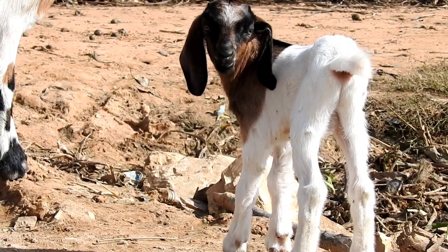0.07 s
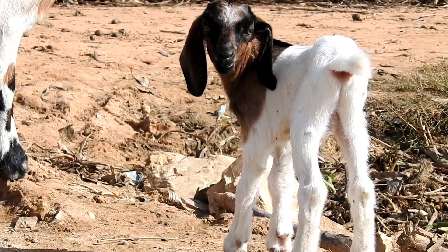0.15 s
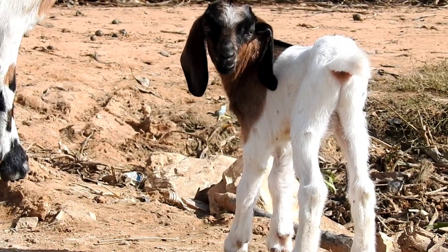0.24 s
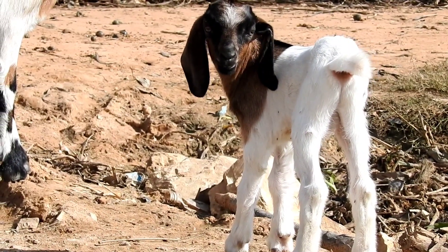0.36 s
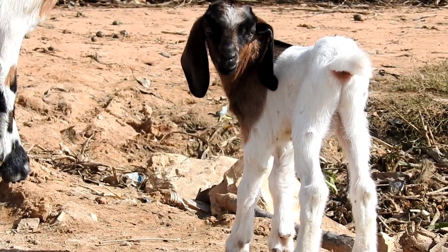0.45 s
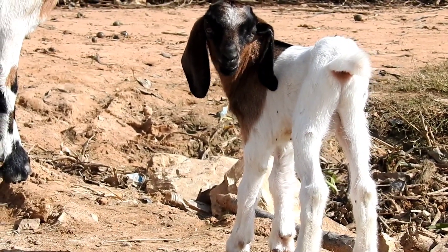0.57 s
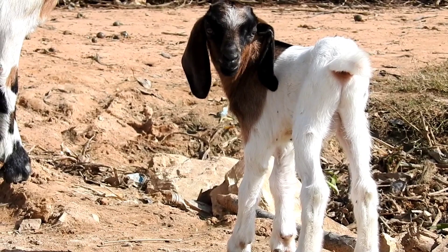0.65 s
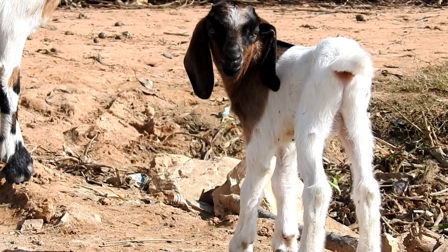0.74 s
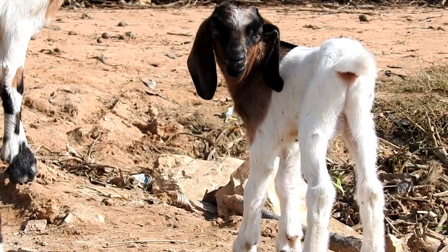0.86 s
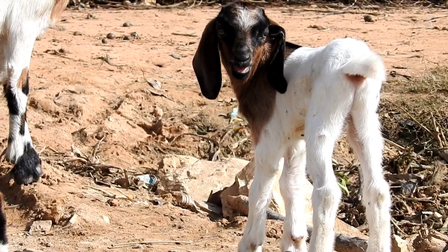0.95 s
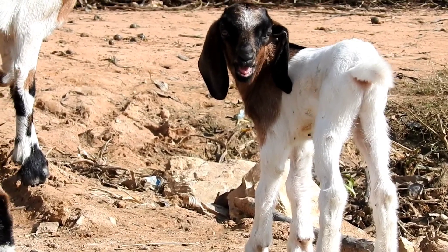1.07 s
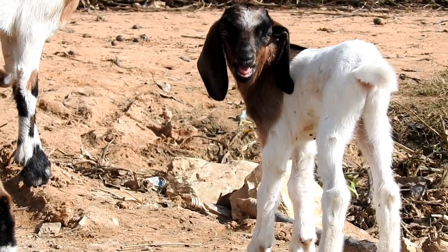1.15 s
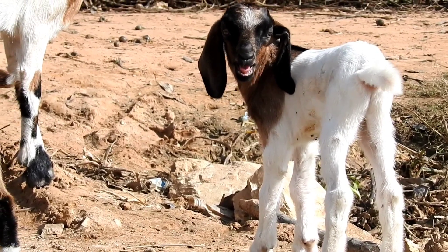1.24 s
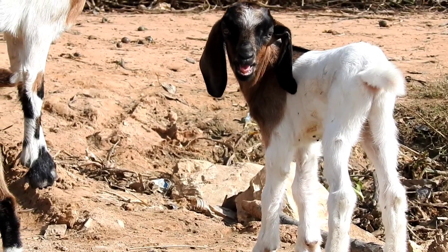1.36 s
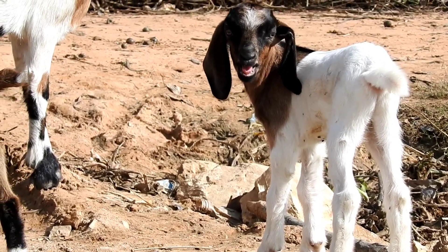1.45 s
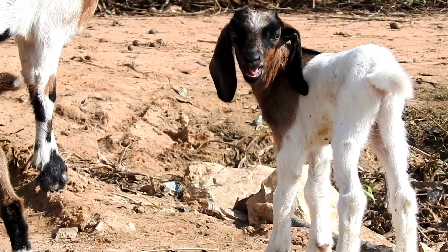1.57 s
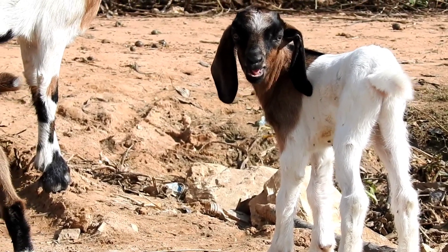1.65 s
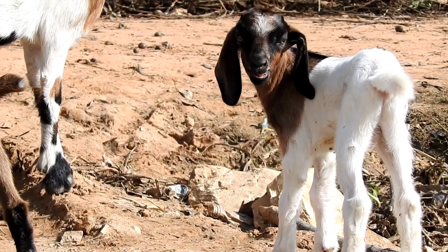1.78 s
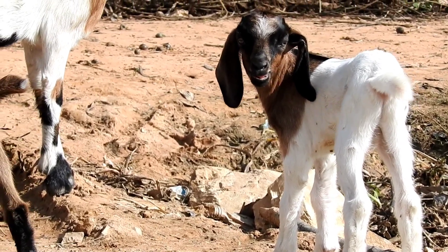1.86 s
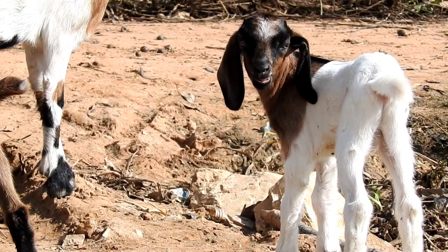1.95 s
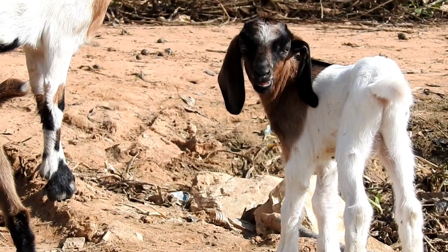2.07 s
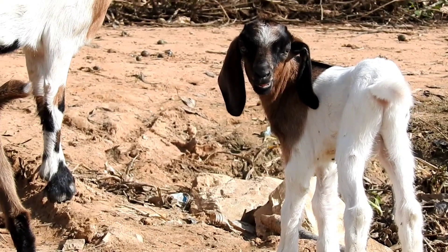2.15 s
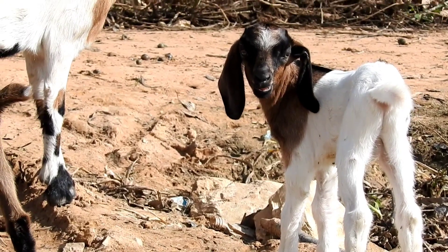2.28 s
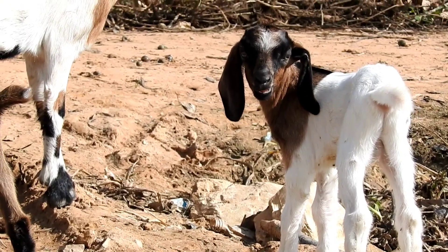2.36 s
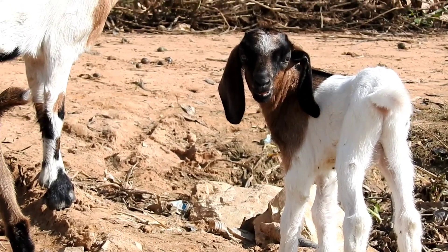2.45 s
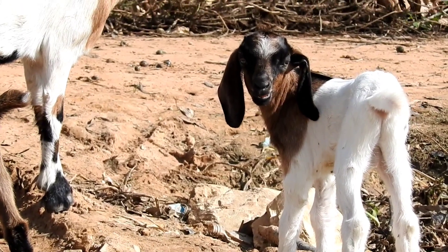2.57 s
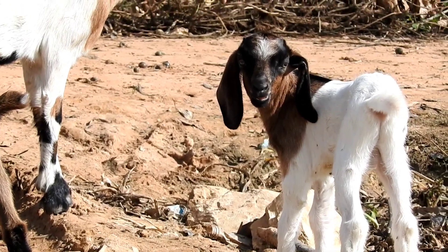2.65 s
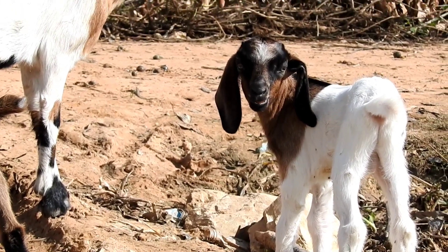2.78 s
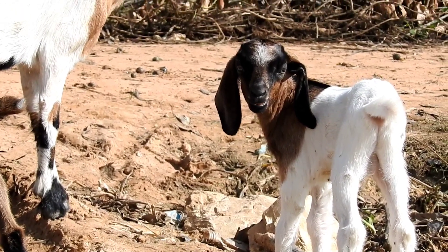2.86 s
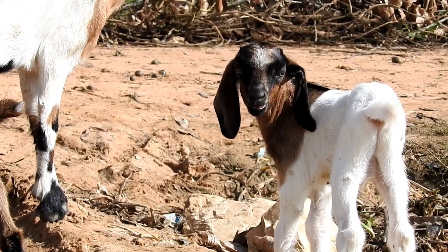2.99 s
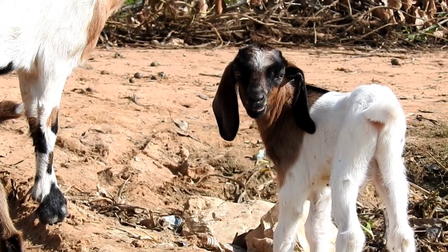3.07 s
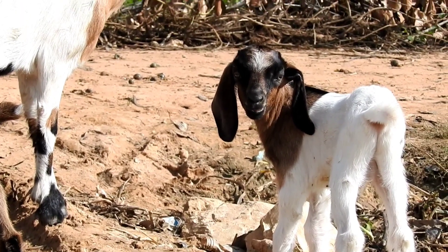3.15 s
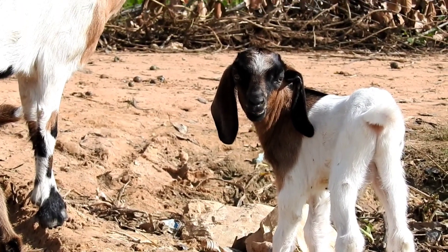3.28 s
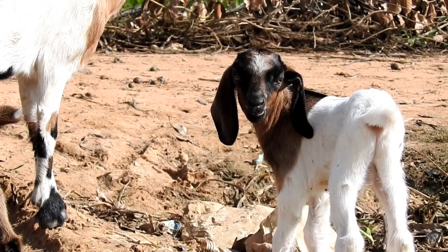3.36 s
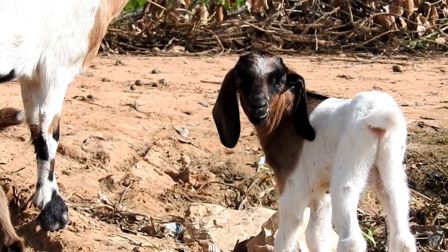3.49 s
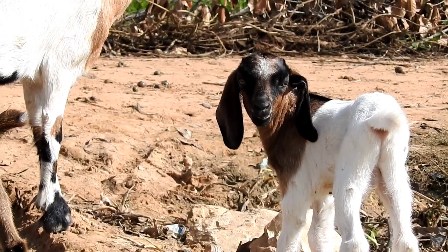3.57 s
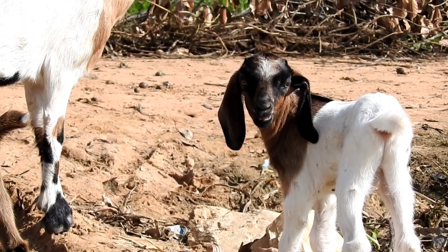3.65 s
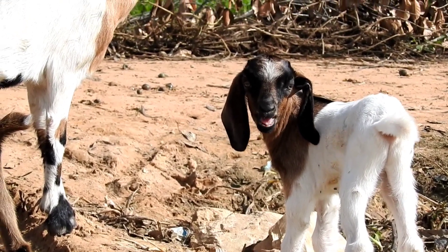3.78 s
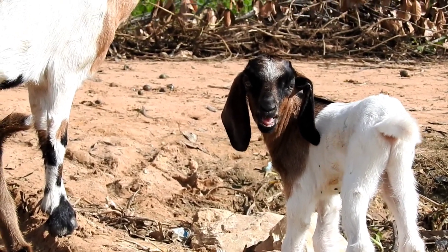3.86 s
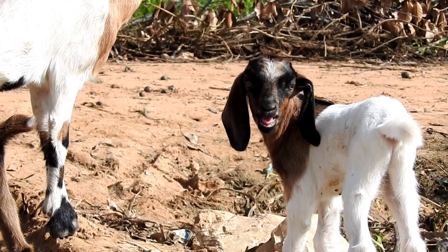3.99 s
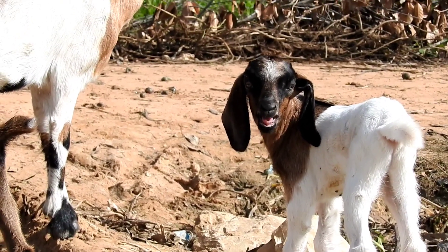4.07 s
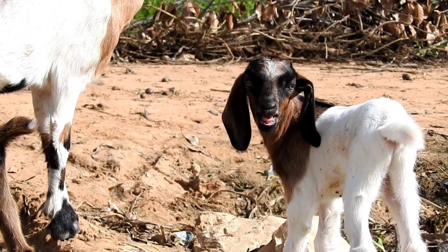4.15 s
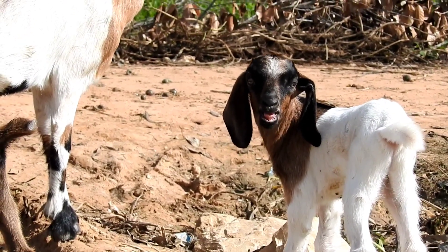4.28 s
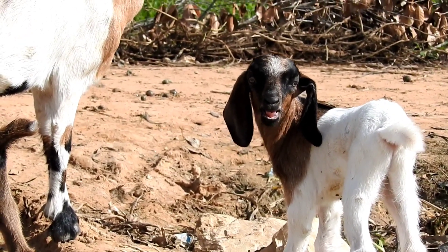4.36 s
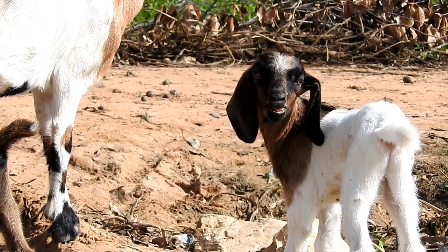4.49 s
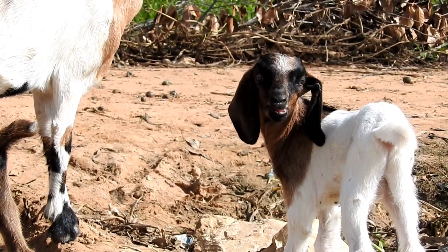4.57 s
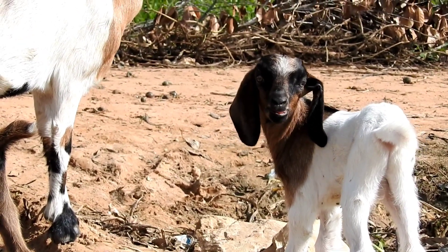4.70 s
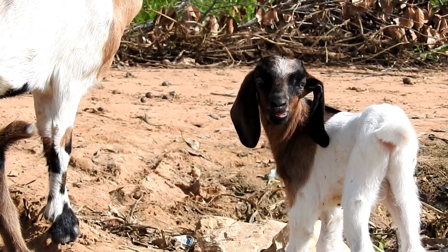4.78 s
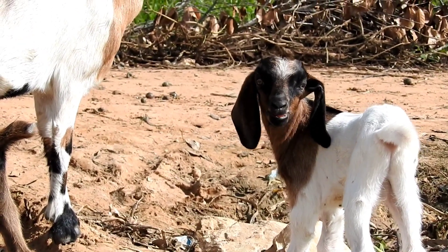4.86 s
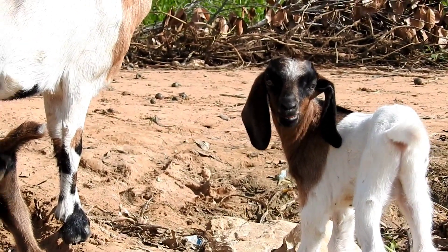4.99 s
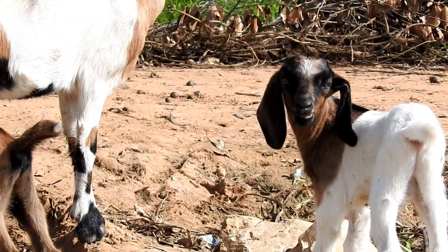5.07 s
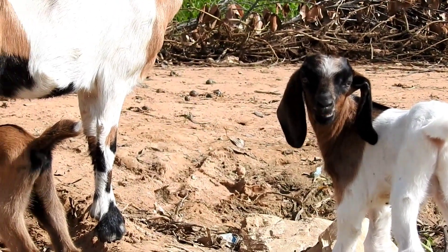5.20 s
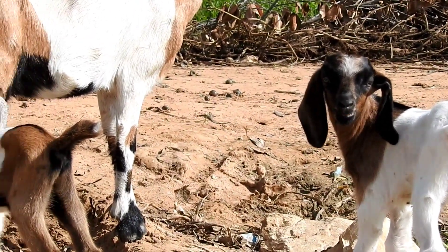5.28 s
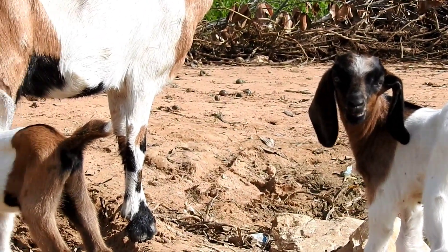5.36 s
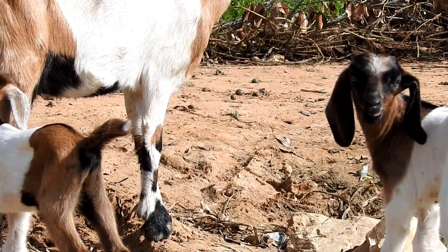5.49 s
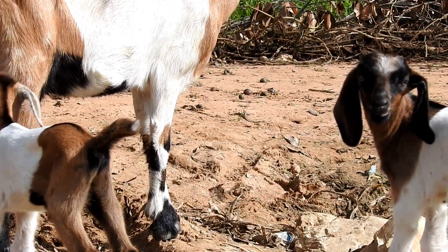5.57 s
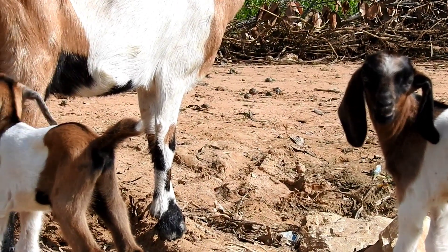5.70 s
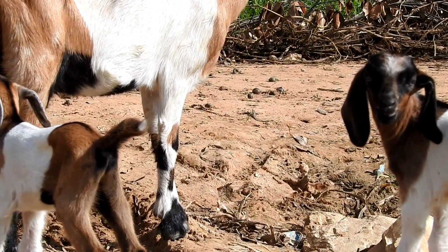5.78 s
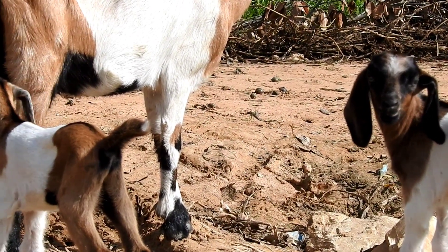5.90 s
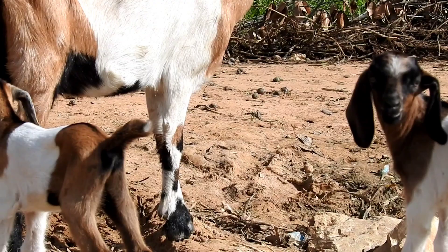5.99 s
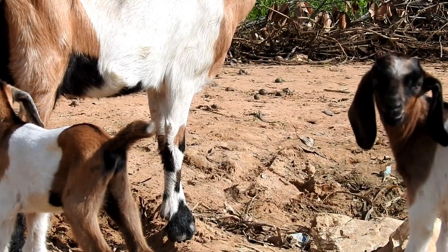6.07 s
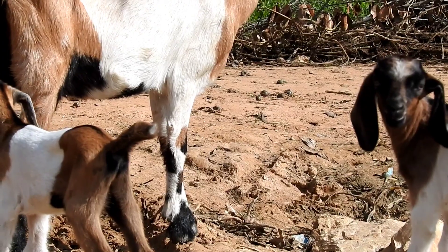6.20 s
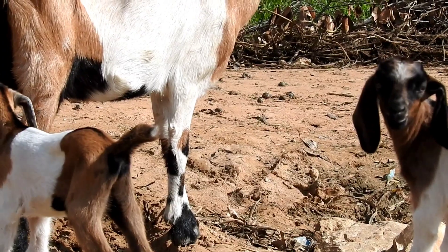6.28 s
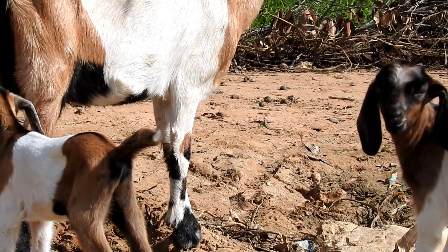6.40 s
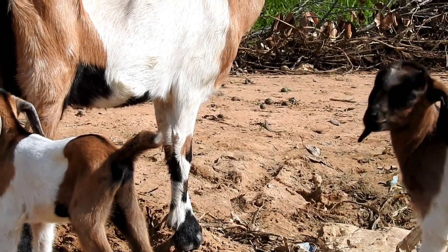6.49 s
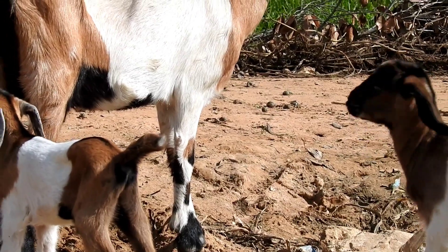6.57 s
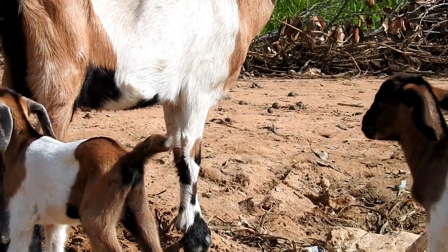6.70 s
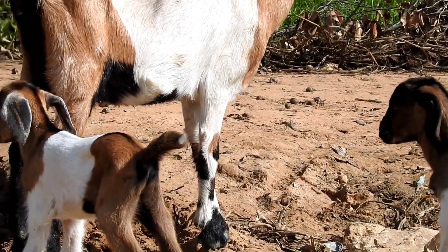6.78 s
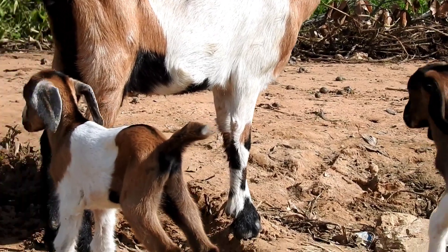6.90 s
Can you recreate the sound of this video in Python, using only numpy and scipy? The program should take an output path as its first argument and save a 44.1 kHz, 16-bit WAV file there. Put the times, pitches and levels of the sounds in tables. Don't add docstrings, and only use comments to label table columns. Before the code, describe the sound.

An open, dry goat yard with a faint far rumble, steady airy hiss and light rustle of litter. At 0 s the end of a neighbouring kid's bleat fades within about a quarter second. A small bird repeats a short note, rough buzz and falling flick roughly three times a second, with tiny whistles from other birds. A far kid calls weakly near 0.3 s and a soft hum follows. From 1.0 to 1.6 s the close newborn bleats loudly, high and nasal, quavering about eleven times a second, then shuts off. Small scuffs and ticks follow; a distant doe calls faintly at 3.5 s. The second bleat runs 3.7 to 4.4 s, weakening at its end. Snorts puff at 4.5, 5.0 and 5.8 s, a far kid answers at 5.1 s, and heavier hoof thuds with gritty crunches grow from 5.7 s to the end at 6.9 s, amid low wind bumps and brighter bird phrases.

```python
import sys
import numpy as np
from scipy import signal
from scipy.fft import rfft, irfft, next_fast_len
from scipy.io import wavfile
from scipy.ndimage import uniform_filter1d

SR = 44100
rng = np.random.default_rng(int(sys.argv[2]) if len(sys.argv) > 2 else 0)


def store_wav(level_fs):
    pcm = np.round(np.clip(np.atleast_2d(level_fs), -1, 1) * 32767)
    wavfile.write(sys.argv[1], SR, pcm.T.astype(np.int16))


def amplitude_ratio(level_db):
    exponent = np.asarray(level_db, float) / 20
    return 10 ** exponent


N = 306009
TIME = np.arange(N) / SR
SPLIT_HZ, TREBLE_LAG_S = 3870, 0.01057
LEFT_RIGHT = np.array([[1], [-1]])


def rms_one(x):
    return x / np.sqrt(np.mean(x ** 2) + 1e-20)


def at_hz(points, hz):
    point_hz, value = np.array(points)[:, :2].T
    return np.interp(np.log(hz), np.log(point_hz), value)


def drift(rate, size=N):
    r = np.exp(-32 * np.pi * rate / SR)
    slow = signal.lfilter([1], [1, -2 * r, r * r], rng.standard_normal(size // 16 + 1002))[1000:]
    return np.interp(np.arange(size) / 16, np.arange(len(slow)), rms_one(slow))


def steady(rate, size):
    return uniform_filter1d(uniform_filter1d(drift(rate, size), size=130), size=90)


def glide(t, s, v):
    slope = np.diff(v) / np.diff(s)
    a, b = slope[:-1], slope[1:]
    m = np.r_[0, np.where(a * b > 0, 2 * a * b / (a + b + 1e-9), 0), 0]
    k = np.clip(np.searchsorted(s, t) - 1, 0, len(s) - 2)
    h = s[k + 1] - s[k]
    u = (t - s[k]) / h
    cubic = m[k] + m[k + 1] - 2 * slope[k]
    square = 3 * slope[k] - 2 * m[k] - m[k + 1]
    return v[k] + h * u * (m[k] + u * (square + u * cubic))


def resonances(modes, hz):
    power = 0
    for top, width, db in modes:
        power = power + amplitude_ratio(2 * db) / (1 + (2 * (hz - top) / width) ** 2) ** 2.314
    return np.sqrt(power)


def coloured(x, gain_of_hz):
    size = next_fast_len(x.shape[-1])
    hz = np.maximum(np.arange(size // 2 + 1) * SR / size, 1)
    return irfft(rfft(x, size) * gain_of_hz(hz), size)[..., :x.shape[-1]]


def bandpass(x, low_hz, high_hz, order=2):
    return signal.sosfilt(signal.butter(order, [low_hz, high_hz], "band", fs=SR, output="sos"), x)


def add(out, s, length, source, db, rise, fall):
    at = slice(round(s * SR), min(round((s + .4) * SR), N))
    t = TIME[at] - TIME[at][0]
    fade = np.exp(-.5 * np.minimum(t, length) / length - np.maximum(t - length, 0) / fall)
    out[at] += amplitude_ratio(db) * source[at] * np.clip(t / rise, 0, 1) * fade


def early(x):
    return np.roll(x, -round(TREBLE_LAG_S * SR), axis=-1)


# (frequency [Hz], likeness [-1 to 1])
EAR_LIKENESS = [(60, 1), (130, 1), (290, 0.95), (640, 0.89), (1410, 0.65), (3100, 0.53), (6820, -0.93),
                (15000, 0.99)]


def banded_noise(spectrum, patchy_db):
    out, edges = 0, np.geomspace(max(spectrum[0][0], 20), min(spectrum[-1][0], 16000), 13)
    white = rng.standard_normal((2, 2, N))
    for k, (low, high) in enumerate(zip(edges, edges[1:])):
        mid, side = bandpass(white[k % 2], low, high)
        alike = np.clip(at_hz(EAR_LIKENESS, np.sqrt(low * high)), -1, 1)
        flicker = amplitude_ratio(patchy_db * (low < 7000) * (drift(3) + .6 * drift(14))) / np.sqrt(low / high + 1)
        out = out + flicker * (np.sqrt(1 + alike) * mid + np.sqrt(1 - alike) * side * LEFT_RIGHT)
    return rms_one(coloured(out, lambda hz: amplitude_ratio(at_hz(spectrum, hz))))


# (frequency [Hz], level [dB per Hz])
AIR_SPECTRUM = [(15, -58), (25, -17.5), (107, 1), (173, -2), (260, -12), (523, -19.5), (970, -30.5),
                (2420, -63), (4150, -16.5), (4620, -45), (9050, -29), (10100, -46), (15500, -54)]


def rumble_and_hiss():
    air = banded_noise(AIR_SPECTRUM, patchy_db=1.5)
    rumble = signal.sosfilt(signal.butter(2, 240, fs=SR, output="sos"), air)
    return amplitude_ratio(-36.5 + 1.14 * drift(1.7)) * rms_one(rumble) + amplitude_ratio(-41.5) * rms_one(air - rumble)


# (time [s], level [dB])
LITTER_STIR = [
    (0, -41),
    (3.3, -41.5),
    (3.8, -37),
    (6.94, -39),
]
# (frequency [Hz], level [dB per Hz])
LITTER_SPECTRUM = [(200, -5.5), (400, -7), (900, -2), (1500, -8.5), (3000, -9), (6000, -4), (9000, -17.5),
                   (12000, -54)]


def rustle():
    stir_db = np.interp(TIME, *np.transpose(LITTER_STIR))
    return amplitude_ratio(stir_db - 4.5) * banded_noise(LITTER_SPECTRUM, patchy_db=3.5)


# (time [s], peak level [dB])
WIND_GUSTS = [(3.82, -25), (4.2, -24.5), (4.4, -46), (4.82, -26.5), (5.38, -29), (5.6, -32), (6.32, -28),
              (6.65, -39)]


def wind():
    puffs = bandpass(rng.standard_normal((2, N)), 42, 115, order=3)
    rise_db_per_s, fall_db_per_s = 298, 250
    level = amplitude_ratio(-56.5)
    for s, db in WIND_GUSTS:
        level = level + amplitude_ratio(db + np.minimum(rise_db_per_s * (TIME - s), fall_db_per_s * (s - TIME)))
    return rms_one(puffs) * level * amplitude_ratio(3. * LEFT_RIGHT)


# (time [s], from [Hz], to [Hz], length [s], level [dB])
WHISTLES = [(0.375, 3550, 3000, 0.023, -44), (0.835, 3900, 2540, 0.026, -42),
            (1.684, 6370, 4980, 0.045, -48), (1.867, 3900, 3000, 0.018, -39),
            (2.402, 3500, 2980, 0.018, -42.5), (2.5, 5450, 4760, 0.017, -43),
            (2.65, 5500, 5000, 0.036, -46), (2.012, 5600, 4640, 0.011, -52),
            (2.225, 6250, 5200, 0.044, -56), (4.4, 3720, 2830, 0.023, -37), (4.618, 3800, 2720, .035, -40),
            (4.764, 3500, 2900, .018, -52), (5.417, 6000, 4960, 0.04, -51), (5.525, 4720, 3500, 0.014, -42),
            (2.853, 5300, 4660, 0.013, -44), (2.936, 3500, 2920, .02, -57), (4.458, 6400, 4760, 0.043, -45),
            (4.69, 5800, 5100, 0.014, -44), (4.953, 5830, 4900, 0.028, -40), (5.863, 6240, 5280, .035, -49),
            (6.1, 6500, 5430, 0.035, -50), (5.234, 4550, 4330, 0.086, -49), (5.262, 3480, 2880, 0.013, -50)]


def flicks():
    out = np.zeros(N)
    for s, from_hz, to_hz, length, db in WHISTLES:
        u = np.arange(round(length * SR)) / (length * SR)
        i = round((s - TREBLE_LAG_S * (to_hz > SPLIT_HZ)) * SR)
        phase = 2 * np.pi * np.cumsum(from_hz + (to_hz - from_hz) * u) / SR
        out[i:i + len(u)] += amplitude_ratio(db) * np.sin(np.pi * u) * np.sin(phase)
    return out


# (time [s], opening note level [dB], buzz level [dB])
BIRD_PHRASES = [(0.022, -38, -40.5), (0.326, -43, -39.5), (0.626, -40.5, -39.5), (0.928, -40, -38),
                (1.852, -35, -38), (2.16, -36, -39), (2.456, -40.5, -38), (2.765, -40, -35.5),
                (3.075, -35.5, -34), (3.379, -33, -35), (3.674, -32, -35), (4.6, -34, -31.5),
                (5.821, -36, -36.5), (6.153, -31, -30.5), (6.486, -32, -30), (6.817, -27.5, -30),
                (1.24, -39, -42), (1.547, -38, -40), (3.984, -35, -41), (4.286, -34, -40)]


def bird():
    out, t = np.zeros(N + SR), np.arange(SR // 5) / SR
    flick_s = .125
    for s, note_db, buzz_db in BIRD_PHRASES:
        stretch, shift = 1 + 0.0072 * rng.standard_normal(2)
        u = t * stretch
        note, flick = u < .03, u > flick_s
        turn = (u * 112 + 0.23 * drift(40, len(t))) % 1
        flick_hz = np.maximum(4000 - 62000 * (u - flick_s), 2900)
        buzz_hz = 4800 - 1100 * turn - 3000 * u
        hz = np.where(note, 4440 - 11000 * u, np.where(flick, flick_hz, buzz_hz))
        shape = amplitude_ratio(note_db) * np.clip(np.minimum(u / .005, (.018 - u) / .005), 0, 1)
        buzz = amplitude_ratio(buzz_db + 2.6 * drift(66, len(t))) * np.sin(np.pi * turn)
        shape += buzz * np.clip((u - .03) / 0.082, 0, 1) * ~flick
        shape += amplitude_ratio(buzz_db - 4.5) * flick * np.clip((flick_s + .021 - u) / .005, 0, 1)
        i = round(s * SR)
        out[i:i + len(t)] += shape * np.sin(2 * np.pi * np.cumsum(hz * shift) / SR)
    return out[:N]


def quaver(t, squeezes):
    s, *columns = np.transpose(squeezes)
    rests = np.r_[s[0] - .03, s[:-1] + 0.538 * np.diff(s), s[-1] + .03]
    turns = np.sort(np.r_[s, rests])
    t = np.clip(t, turns[0], turns[-1])
    return [glide(t, turns, np.r_[0, np.ravel([c, 0 * c], "F")]) for c in columns]


# (frequency [Hz], left minus right [dB])
HEAD_SHADOW = [(500, 0), (800, 0.5), (1300, 0), (1600, -4), (2000, 4), (2400, 0), (3300, 0.5), (3900, 4),
               (6000, -0.9), (15000, -0.5)]


def bleat(turns, throat, squeezes=(), shade=-0.98):
    s, *columns = np.transpose(turns)
    at = slice(round(s[0] * SR), round(s[-1] * SR))
    pitch, level_db, low_db, rough = [glide(TIME[at], s, c) for c in columns]
    size = len(pitch)
    rise, loss_db = quaver(TIME[at], squeezes) if squeezes else (0, 0)
    pitch, level_db = pitch + rise, level_db - loss_db
    shake = np.clip(rough + .0006 * rise, 0, 1) ** 2
    wobble = 1 + 0.00253 * steady(75, size) + 0.035 * shake * drift(290, size)
    phase = 2 * np.pi * np.cumsum(pitch * wobble) / SR
    voice, power = 0, 1e-12

    def lips(hz):
        return resonances(throat, hz) / np.sqrt(1 + (hz / 11300) ** 16)

    for k in range(1, 21):
        hz = k * pitch
        tilt_db = (low_db - 0.09 * rise) * (k > 1) / (1 + (hz / 4500) ** 8)
        tilt_db = tilt_db + 0.38 * low_db / (1 + (7600 / hz) ** 8)
        gain = lips(hz[::8]) * amplitude_ratio(tilt_db[::8])
        power = power + gain ** 2 / 2
        lean = amplitude_ratio(-shade * at_hz(HEAD_SHADOW, hz[::8]) / 2 * LEFT_RIGHT)
        shimmer = amplitude_ratio((.7 + .2 * k) * steady(70, size) + (4 * shake + .07 * k) * drift(200, size))
        partial = np.sin(k * phase + rng.normal(0, 1.0) - np.pi / 2 + 0.11 * shade * LEFT_RIGHT)
        voice = voice + np.repeat(gain * lean, 8, axis=1)[:, :size] * shimmer * partial
    voice = voice / np.sqrt(np.repeat(power, 8)[:size])
    air = rms_one(coloured(rng.standard_normal(size), lambda hz: lips(hz) * (0.24 + (hz / 5000) ** 3)))
    out = np.zeros((2, N))
    out[:, at] = amplitude_ratio(level_db) * (voice * np.sqrt(1 - shake ** 2) + (amplitude_ratio(-31) + shake) * air)
    return out


# (time [s], pitch [Hz], level [dB], low partials [dB], roughness [0-1])
DOE_CALL = [(3.49, 625, -64, 0, .6), (3.52, 625, -54, 0, .5), (3.575, 620, -56, 0, .6),
            (3.595, 590, -66, 0, .7), (3.62, 585, -54, 0, .5), (3.67, 600, -64, 0, .8),
            (3.73, 665, -56, 0, .5), (3.755, 670, -44, 0, .3), (3.775, 670, -62, 0, .5)]
# (frequency [Hz], width [Hz], level [dB])
DOE_RESONANCES = [(593, 150, -11), (1200, 360, 10), (2300, 300, -12), (3500, 800, -30)]


def far_doe():
    return bleat(DOE_CALL, DOE_RESONANCES, shade=0.)


# (time [s], pitch [Hz], level [dB], low partials [dB], roughness [0-1])
FAR_CALL = [
    (.27, 690, -61, 0, .3),
    (.33, 740, -51, 0, .3),
    (.42, 779, -53, 0, .3),
    (.53, 793, -60, 0, .4),
    (.7, 760, -66, 0, .6),
]
FAR_ANSWER = [
    (5.09, 726, -60, 0, .6),
    (5.13, 749, -45, 0, .65),
    (5.18, 741, -50, 0, .7),
    (5.22, 727, -61, 0, .7),
    (5.3, 724, -68, 0, .7),
]
# (frequency [Hz], width [Hz], level [dB])
FAR_RESONANCES = [(780, 300, -11), (1450, 140, 13.5), (2300, 190, 4), (3930, 290, -27), (5400, 290, -26)]


def far_kid():
    return bleat(FAR_CALL, FAR_RESONANCES, shade=0.) + bleat(FAR_ANSWER, FAR_RESONANCES, shade=0.)


# (frequency [Hz], width [Hz], level [dB])
NASAL_RESONANCES = [(570, 210, 6), (1620, 660, -15), (3000, 1700, -22)]


def closed_mouth(turns):
    return bleat(turns, NASAL_RESONANCES)


# (time [s], pitch [Hz], level [dB], low partials [dB], roughness [0-1])
FAINT_HUM = [
    (.52, 622, -55, 0, 0.64),
    (.62, 646, -49, 0, 0.66),
    (.74, 656, -54, 0, 0.71),
]


def faint_hum():
    return closed_mouth(FAINT_HUM)


# (time [s], length [s], level [dB])
SNORT_PUFFS = [
    (2.566, 0.13, -45.5),
    (4.47, 0.059, -26),
    (5.015, 0.08, -29),
    (5.801, 0.074, -32.5),
    (6.13, 0.12, -44),
    (6.29, 0.13, -46),
]
# (frequency [Hz], width [Hz], level [dB])
NOSTRILS = [(951, 72, 11.5), (1510, 95, 1), (2230, 105, -1.5), (2690, 26, -32), (3900, 100, -27)]


def snorts():
    modes = np.array(NOSTRILS) * [1, 1.6, 1]

    def nose(hz):
        return resonances(modes, hz) + amplitude_ratio(-9.5) / (1 + (hz / 3000) ** 4)

    flutter = amplitude_ratio(3 * drift(70))
    air = rms_one(coloured(flutter * rng.standard_normal(N), nose))
    out = np.zeros(N)
    for s, length, db in SNORT_PUFFS:
        add(out, s, length, air, db, .014, .05)
    return out


# (time [s], thud level [dB], length [s], crunch level [dB])
HOOF_STAMPS = [(2.985, -33, 0.01, -44), (4.465, -32.5, 0.036, -34), (4.582, -28, 0.012, -27.5),
               (4.626, -35, 0.035, -36), (4.895, -32.5, 0.034, -32), (5.009, -35.5, 0.058, -56),
               (5.173, -36.5, 0.027, -37.5), (5.43, -38, 0.016, -39), (5.679, -32, 0.031, -54),
               (5.712, -24.5, 0.014, -23.5), (5.8, -39, 0.074, -37), (5.939, -28, 0.019, -25.5),
               (5.967, -25, 0.028, -27), (6.217, -23.5, 0.021, -24.5), (6.451, -22.5, 0.026, -27),
               (6.563, -31.5, 0.011, -35), (6.72, -22.5, 0.036, -25.5)]
# (time [s], length [s], crunch level [dB], grit level [dB])
HOOF_SCUFFS = [(2.295, .01, -46, -68), (2.622, 0.02, -36, -44.5), (2.658, 0.021, -36.5, -49),
               (3.383, 0.035, -41.5, -62), (3.415, 0.0059, -40, -36.5), (4.878, .008, -38, -42),
               (5.45, 0.021, -29.5, -41), (5.744, 0.04, -38.5, -43.5), (6.094, 0.0096, -36, -60),
               (6.256, 0.055, -42.5, -45.5), (6.493, 0.057, -37, -47), (6.617, .009, -39, -66),
               (6.667, 0.0079, -67, -57)]
# (frequency [Hz], level [dB per Hz])
CRUNCH_SPECTRUM = [(150, 2.5), (300, -9.5), (600, 1.5), (900, -5.5), (1150, -18.5), (1900, -3), (2400, -8),
                   (3000, -7), (3800, -13.5), (5000, -53)]
# (frequency [Hz], level [dB per Hz])
GRIT_SPECTRUM = [(2500, -43), (4200, -7), (6800, -3), (8500, -17), (11000, -35), (15000, -57)]


def hooves():
    grain_db = 6.2 * np.minimum(rng.exponential(1, (2, N)), 4)
    grains = rng.standard_normal((2, N)) * amplitude_ratio(grain_db)
    crunch = rms_one(coloured(grains[0], lambda hz: amplitude_ratio(at_hz(CRUNCH_SPECTRUM, hz))))
    grit = rms_one(coloured(grains[1], lambda hz: amplitude_ratio(at_hz(GRIT_SPECTRUM, hz))))
    thud = rms_one(bandpass(rng.standard_normal(N), 130, 420))
    out = amplitude_ratio(-57.5 + 3.9 * drift(14)) * grit
    steps = list(HOOF_SCUFFS)
    for s, thud_db, length, crunch_db in HOOF_STAMPS:
        add(out, s, length, thud, thud_db - 3.5, .003, .011)
        spray_db = -30 + 1.76 * (thud_db + 22.5)
        steps.append((s, length, crunch_db, spray_db))
    for s, length, crunch_db, grit_db in steps:
        add(out, s, length, crunch, crunch_db, .007, .008)
        add(out, s + 0.0013, length, grit, grit_db, .005, .006)
    return out


# (time [s], ring [Hz], peak level [dB], time to fall 60 dB [s])
STALK_SNAPS = [(.667, 2000, -41, 0.036), (2.851, 4870, -40, .02), (2.888, 6700, -38, .015),
               (2.985, 1750, -38, .02), (2.988, 6500, -35, .015), (3.25, 2200, -40, .012),
               (3.252, 5250, -36, .012), (3.398, 6300, -37, .02), (3.42, 6800, -29, .012),
               (4.59, 2300, -30, .012), (4.59, 6500, -36, .01), (2.630, 2520, -40, 0.011),
               (2.666, 2480, -42, 0.017), (4.878, 2300, -31.5, .008), (4.967, 3200, -33, .015),
               (5.378, 6000, -31, .004), (5.635, 2230, -38, 0.061), (6.103, 1800, -35.5, .025),
               (6.668, 7650, -35, 0.011)]


def snaps():
    out, t = np.zeros(N), TIME[:SR // 10]
    for s, hz, db, t60 in STALK_SNAPS:
        i = round(s * SR)
        out[i:i + len(t)] += amplitude_ratio(db - 60 * t / t60) * np.sin(2 * np.pi * hz * t)
    return out


# (time into it [s], pitch [Hz], level [dB], low partials [dB], roughness [0-1])
NEIGHBOUR_QUAVER = [
    (0, 569.4, -33, -4, 0.33),
    (.018, 642, -40, -1, 0.5),
    (.036, 721, -48, -15, 0.55),
    (.052, 631, -43, 4, 0.3),
    (.072, 630, -38, 2.5, 0.3),
]
# (frequency [Hz], width [Hz], level [dB])
NEIGHBOUR_RESONANCES = [(653, 260, -3), (1130, 300, -14), (1910, 650, -4), (3000, 580, -9.5),
                        (4440, 720, -8), (5950, 1450, -7), (8000, 1500, -51)]


def neighbour():
    starts = -0.071 + .1015 * np.arange(4)
    turns = np.concatenate([np.add(NEIGHBOUR_QUAVER, [s, 0, 0, 0, 0]) for s in starts])
    turns[-1, 2] -= 15
    return bleat(turns[turns[:, 0] >= 0], NEIGHBOUR_RESONANCES, shade=0.)


# (time [s], pitch [Hz], level [dB], low partials [dB], roughness [0-1])
KID_BLEATS = [
    [(.976, 686, -30, 5, .05), (.995, 702, -26.5, 12, 0.24), (1.016, 804, -24, -8, 0.5),
     (1.03, 907, -26, -13, 0.2), (1.047, 865, -19.5, -10, 0.6), (1.06, 850, -20.5, -7.5, 0),
     (1.087, 765, -14, 3.5, 0.2), (1.169, 732, -11, 0.5, 0.2), (1.3, 768.5, -11.5, 2.5, 0.07),
     (1.588, 770.5, -13, 2, 0.1), (1.611, 694, -26, -6, 0.8)],
    [(3.695, 934, -43, -10, 0.7), (3.745, 951, -36, -11, 0.87), (3.768, 840, -31, 3, 0.77),
     (3.782, 812, -22.5, 0, 0.2), (3.813, 855, -19.5, -8, 0.3), (3.869, 751.6, -16, 6, 0),
     (4.08, 756.6, -12, 2.5, 0.04), (4.345, 787.4, -23, 2.5, 0.38), (4.372, 682, -28.5, 6, 0.85)],
]
# (time [s], pitch rise [Hz], level loss [dB])
FOLD_SQUEEZES = [
    [(1.119, 81.3, 4.5), (1.218, 55.4, 4), (1.301, 113.3, 6.5), (1.392, 127.6, 6.5), (1.488, 109, 5.5),
     (1.577, 102.8, 7.5)],
    [(3.9, 33, 3), (3.997, 75.7, 3), (4.088, 138.6, 8), (4.178, 118.7, 9.5), (4.279, 97.2, 4),
     (4.349, 52.6, -1.5)],
]
# (time after [s], pitch change [Hz], level change [dB])
VOICE_RELEASE = [
    (.008, -38, -2),
    (.022, -80, -36),
]
# (time from shutting [s], pitch [Hz], level [dB], low partials [dB], roughness [0-1])
CLOSING_HUM = [
    (-.004, 677, -43, -1, 0.2),
    (.01, 621, -33.5, 18, 0.5),
    (.026, 557, -37.5, 7, .19),
    (.044, 540, -79, 0, .18),
]
# (frequency [Hz], width [Hz], level [dB])
KID_RESONANCES = [(617, 139, 2), (905, 87, -11.5), (1547, 500, 1.5), (2400, 790, -8.5), (3290, 1040, -3),
                  (3820, 500, 3), (5710, 1310, 8.5), (6500, 200, 10.5), (7200, 600, -5.5), (8310, 390, -12),
                  (11000, 2400, -71)]


def kid():
    out = 0
    for effort, squeezes in zip(map(np.array, KID_BLEATS), FOLD_SQUEEZES):
        first, shut = effort[0], effort[-1]
        attack = first + [-0.023, 0, -45, 0, 0]
        release = [shut + [*change, 0, 0] for change in VOICE_RELEASE]
        out = out + bleat([attack, *effort, *release], KID_RESONANCES, squeezes)
        out = out + closed_mouth(np.add(CLOSING_HUM, [shut[0], 0, 0, 0, 0]))
    return out


def yard(x, echo_s, echo_db, tail_db, t60, cut_hz):
    t = np.arange(SR * 2 // 3) / SR
    tail = rng.standard_normal((2, len(t))) * amplitude_ratio(-60 * t / t60) * np.clip(t / 0.009, 0, 1)
    tail = tail / np.sqrt(np.sum(tail[0] ** 2))
    tail = amplitude_ratio(tail_db) * signal.lfilter(*signal.butter(2, cut_hz, fs=SR), tail)
    tail[:, round(echo_s * SR)] += amplitude_ratio(echo_db)
    return x + signal.fftconvolve(x * np.ones((2, 1)), tail, axes=1)[:, :N]


def scene():
    background = rumble_and_hiss() + rustle() + wind()
    far = flicks() + early(bird()) + far_doe() + far_kid()
    near = faint_hum() + snorts() + hooves() + snaps() + early(neighbour() + kid())
    far = yard(far, echo_s=0.054, echo_db=-15, tail_db=2.3, t60=0.37, cut_hz=5400)
    near = yard(near, echo_s=0.063, echo_db=-27.5, tail_db=-12.5, t60=0.45, cut_hz=3400)
    return background + far + near


def two_paths(hz):
    lows = 1 / np.sqrt(1 + (hz / SPLIT_HZ) ** 41)
    late = np.sqrt(1 - lows ** 2) - amplitude_ratio(-18) * lows
    return lows + late * np.exp(-2j * np.pi * hz * TREBLE_LAG_S)


def top_cut(x):
    return signal.sosfilt(signal.butter(12, 15700, fs=SR, output="sos"), x)


def record(dry):
    wet = coloured(dry, two_paths) + amplitude_ratio(-68.5) * rng.standard_normal(dry.shape)
    wet = signal.sosfilt(signal.butter(2, 38, "high", fs=SR, output="sos"), wet)
    return top_cut(np.clip(wet, -1, 1))


dry = scene()
out = record(dry)
store_wav(out)
```